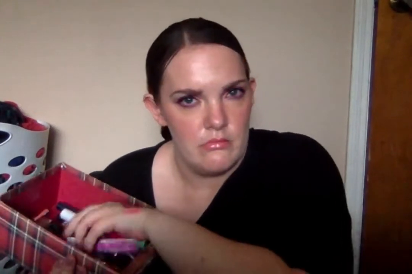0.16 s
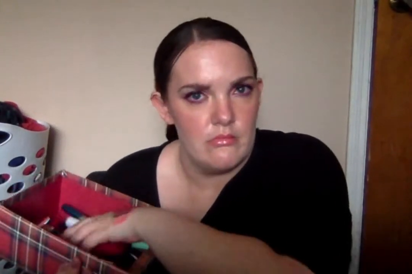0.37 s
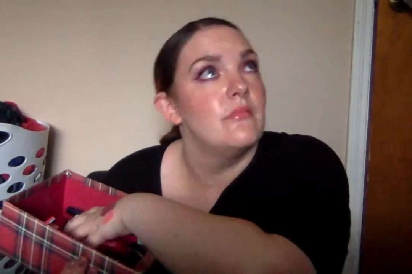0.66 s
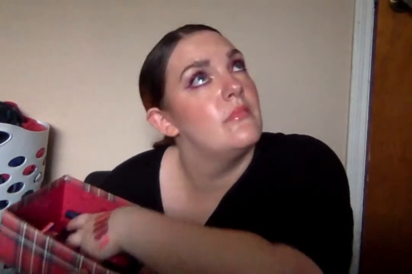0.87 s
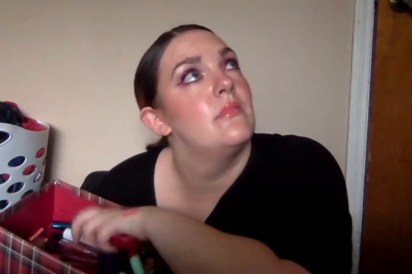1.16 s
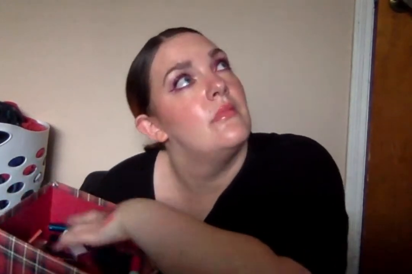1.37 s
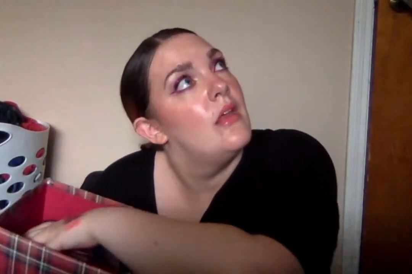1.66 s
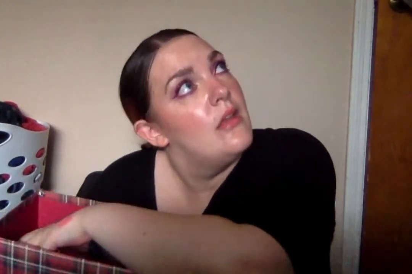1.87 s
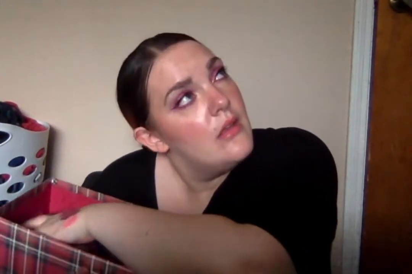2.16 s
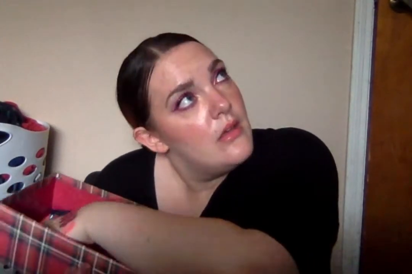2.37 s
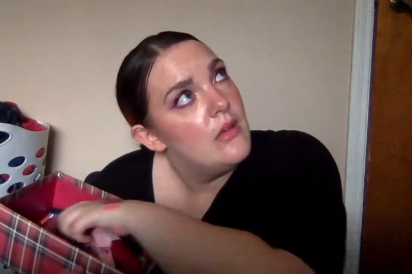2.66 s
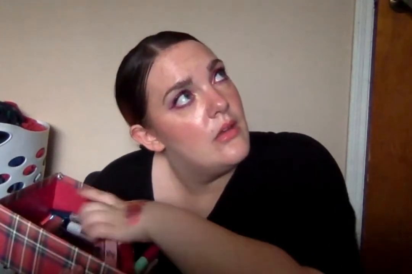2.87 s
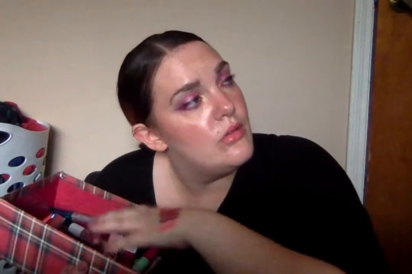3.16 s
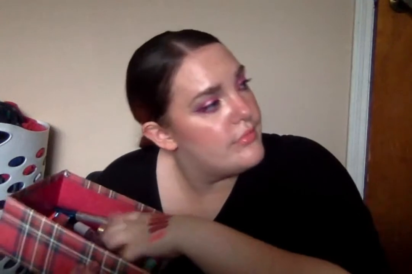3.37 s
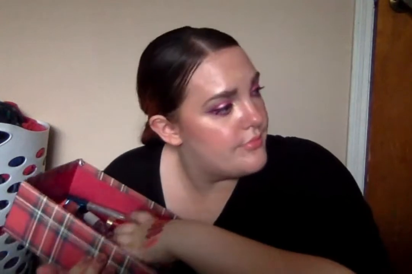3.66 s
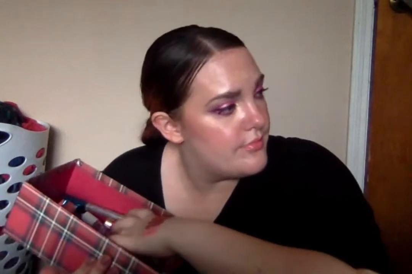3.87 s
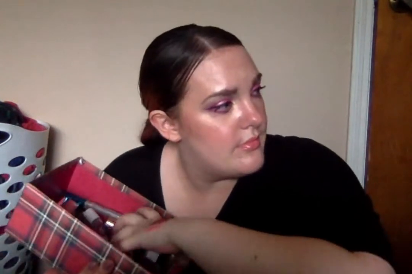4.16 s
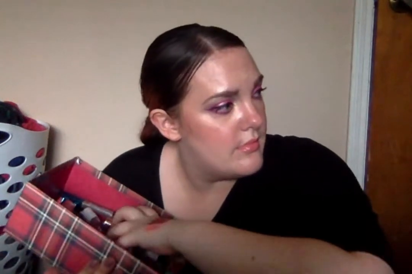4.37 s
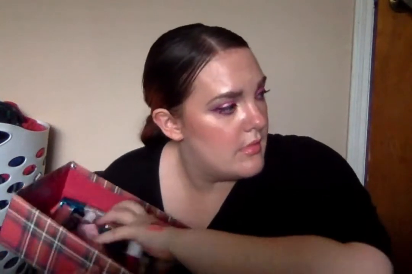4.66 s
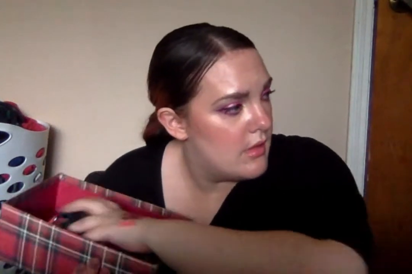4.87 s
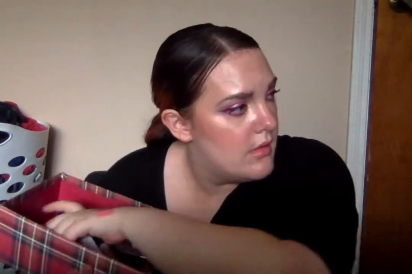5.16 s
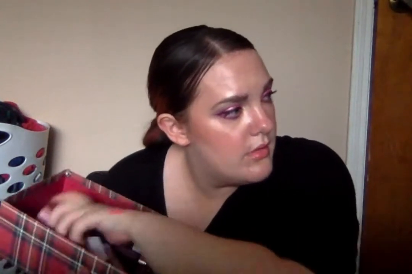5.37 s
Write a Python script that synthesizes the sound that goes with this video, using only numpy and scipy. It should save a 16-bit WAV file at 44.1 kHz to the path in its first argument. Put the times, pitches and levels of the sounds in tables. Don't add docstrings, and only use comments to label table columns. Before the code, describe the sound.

Close rummaging in a cardboard box full of small capped plastic tubes: dry rattle, bright cap clicks and hollow knocks in uneven strokes. Two bursts are separated by a lull, then activity thins to light taps before a strong final flurry ending on heavy knocks. A faint steady laptop hiss and thin whine lie beneath; nearby walls throw back quick, boxy echoes.

```python
import sys
import numpy as np
from scipy import signal
from scipy.fft import rfft, irfft, next_fast_len
from scipy.io import wavfile
from scipy.ndimage import uniform_filter1d

SR = 44100
rng = np.random.default_rng(int(sys.argv[2]) if len(sys.argv) > 2 else 0)


def file_out(sig):
    cols = np.atleast_2d(sig).T
    lim = np.clip(cols, -1, 1)
    pcm = np.round(lim * 32767).astype(np.int16)
    wavfile.write(sys.argv[1], SR, pcm)


def rack_gain(trim_db):
    fader = np.asarray(trim_db, float)
    return 10 ** (fader / 20)


N = 243564
LONG = next_fast_len(N)
ALL_HZ = np.fft.rfftfreq(LONG, 1 / SR)

# (f/Hz, level/dB, t60/s)
BOX_MODES = [(265, 0, .035), (375, -3, .03), (425, 0, .035), (465, 0, .035), (640, -9, .02),
             (730, -4, .025), (850, -7, .02)]
# (f/Hz, level/dB, t60/s)
TUBE_MODES = [(950, -2.5, 0.0087), (1180, 3, 0.012), (1400, -10.5, 0.024), (1531, 7, 0.0085),
              (1849, -3, 0.02), (2185, 6, 0.0078), (2493, 1, 0.007)]
# (f/Hz, level/dB, t60/s)
CAP_MODES = [(3220, 7, 0.0034), (3760, 10.5, 0.0045), (4590, 2.5, 0.0063), (5610, -17, 0.018),
             (6860, -11, 0.0082), (7730, 5, 0.0022), (10640, -19, 0.0069), (10650, -10.5, 0.006),
             (14200, -9, 0.0067), (14330, -6, 0.0044)]


def evened(x):
    return x / np.sqrt(np.mean(x ** 2) + 1e-20)


def read(points, hz):
    f, value = np.transpose(points)
    return np.interp(np.log(hz + 1), np.log(f + 1), value)


def coloured(x, db):
    return irfft(rfft(x, LONG) * rack_gain(db), LONG)[..., :N]


def add(mix, s, sound):
    part = mix[round(s * SR):][:len(sound)]
    part += sound[:len(part)]


def ring(hz, db, t60, rise=0.00036, size=1500):
    t = np.arange(size) / SR
    hz, db, t60 = (np.reshape(v, (-1, 1)) for v in (hz, db, t60))
    sines = rack_gain(db - 60 * t / np.abs(t60)) * np.sin(2 * np.pi * hz * t)
    return sines.sum(0) * (1 - np.exp(-t / rise)) ** 2


def struck(modes, luck, detune, uneven_db, size=1500):
    hz, db, t60 = np.transpose(modes)
    shifted_hz = hz * (1 + detune * luck[:len(hz)])
    weighted_db = db + uneven_db * luck[-len(hz):]
    sound = ring(shifted_hz, weighted_db, t60, rise=0.00057, size=size)
    return sound / abs(sound).max()


def near_note(modes, hz, fall_db=13):
    return [(f, db - fall_db * abs(np.log(f / hz)), t60) for f, db, t60 in modes]


def floor():
    # (f/Hz, level/dB)
    hiss_colour = [(15, -52), (25, -39), (236, -16), (607, -44), (840, -17), (5880, -15), (7510, -13),
                   (8830, -21.5), (11300, -18), (16000, -41)]
    # (f/Hz, peak level/dB)
    whines = [
        (258, -79),
        (7660, -102),
        (11509, -89),
    ]
    hiss = rack_gain(-83) * evened(coloured(rng.standard_normal(N), read(hiss_colour, ALL_HZ)))
    t = np.arange(N) / SR
    waver = evened(uniform_filter1d(rng.standard_normal(N), 600))
    return hiss + sum(rack_gain(db + 2.7 * waver) * np.sin(2 * np.pi * hz * t) for hz, db in whines)


def stirring(height_share, rest_db=0):
    # (deepest t/s, effort level/dB, length/s, height in the heap/dB, higher is brighter)
    strokes = [(.01, -41, 0.12, -16), (0.147, -35, 0.041, -21.5), (0.342, -41.5, 0.21, -8.5),
               (0.504, -75, 0.24, -16), (0.822, -46, 0.1, 19.5), (0.916, -53, 0.064, 14.5),
               (1.036, -46.5, 0.12, 14.5), (1.21, -39, 0.2, -9.5), (1.353, -43.5, 0.11, -16),
               (1.445, -53.5, 0.1, 11.5), (1.644, -63.5, 0.26, -9.5), (2.182, -38.5, 0.13, -3.5),
               (2.327, -34.5, 0.099, -19), (2.433, -43, 0.16, -19.5), (2.553, -39, 0.11, -22.5),
               (2.774, -38, 0.17, -7.5), (3.037, -37.5, 0.12, -8), (2.89, -42, 0.095, -12),
               (2.977, -44.5, 0.071, 4), (3.129, -39, 0.013, -11), (3.462, -48, 0.16, -4),
               (3.752, -57.5, 0.096, 23.5), (3.882, -45.5, 0.14, -29), (4.037, -50, 0.12, -21),
               (4.346, -69, 0.1, -12), (4.246, -67, 0.1, -14), (4.518, -57, 0.07, -39),
               (4.654, -36.5, 0.1, -11.5), (4.716, -43.5, 0.096, 12), (4.778, -42, 0.17, 5),
               (4.847, -32.5, 0.084, -3.5), (4.945, -45, 0.18, 6.5), (5.026, -37.5, 0.073, 1),
               (5.156, -46.5, 0.34, -41), (5.29, -45.5, 0.056, -15), (5.514, -29, 0.15, -30),
               (0.693, -63, 0.14, -23), (3.251, -68, 0.14, 6), (1.531, -60.5, 0.066, 15.5),
               (1.937, -78.5, 0.14, 2)]
    dig_db, settle_db = 49.5, 22.5
    t = np.arange(0, N / SR + .01, .005)
    s, db, length, height_db = np.transpose(strokes)[..., None]
    part = (t - s) / abs(length)
    level_db = db + height_share * height_db + np.where(part < 0, dig_db, -settle_db) * part
    power = (rack_gain(level_db) ** 2).sum(0) + rack_gain(-89 + rest_db) ** 2
    return np.interp(np.arange(N) / SR, t, 10 * np.log10(power))


def rumble():
    band = signal.butter(2, [40, 160], "band", fs=SR, output="sos")
    low = signal.sosfilt(band, rng.standard_normal(N))
    lumps = rack_gain(6 * evened(uniform_filter1d(rng.standard_normal(N), 900)))
    return evened(low * lumps) * rack_gain(0.18 * (stirring(0) + 58.5) - 69)


def bumps():
    # (t/s, peak level/dB, f/Hz)
    knocks = [(0.305, -38.5, 132), (0.797, -41, 132), (1.054, -38, 192), (1.12, -23, 193),
              (2.172, -43, 136), (2.399, -36, 130.9), (2.439, -46.5, 70.0), (2.76, -23, 194.5),
              (2.862, -42, 92), (2.9, -33, 138), (2.916, -41, 115), (3.016, -36.5, 111.4), (3.675, -48, 97),
              (4.246, -60, 65), (1.42, -43, 110), (3.27, -59, 130), (.17, -50, 141), (5.401, -42, 252),
              (5.445, -38, 185)]
    out = np.zeros(N)
    for s, db, hz in knocks:
        add(out, s, ring(hz, db + 12.5, 6.85 / hz, rise=0.0074, size=4000))
    return out


def rattle(modes, level_db, per_s, spread_db, trim_db, count=40, size=1500):
    at = np.flatnonzero(rng.random(N) < per_s / SR)
    strength, side, which = rng.random((N, 3))[at].T
    blows = [struck(modes, luck, 0.1, 5.0, size=size) for luck in rng.standard_normal((count, 20))]
    contact_db = spread_db * np.minimum(-np.log(strength), 4) + trim_db + level_db[at]
    gains = rack_gain(contact_db) * np.sign(side - .5)
    out = np.zeros(N)
    for i, gain, k in zip(at, gains, (which * count).astype(int)):
        add(out, i / SR, gain * blows[k])
    return out / np.sqrt(np.mean(np.square(blows)) * size * per_s / SR)


def heap():
    # (f/Hz, level/dB, t60/s)
    shell_modes = [(2410, -1, 0.0057), (2800, -7.5, 0.02), (3300, -1.5, 0.0033), (3970, -6, 0.01),
                   (4500, -11.5, 0.0056), (5250, -10, 0.0035)]
    box = rattle(BOX_MODES, stirring(0), per_s=210, spread_db=6.5, trim_db=-9.5)
    tubes = rattle(TUBE_MODES, stirring(0.32, rest_db=-4.0), per_s=260, spread_db=5.0, trim_db=-13.5)
    caps = rattle(CAP_MODES, stirring(0.75, rest_db=4), per_s=1000, spread_db=5.5, trim_db=-24.0, size=500)
    shells = rattle(shell_modes, stirring(0.23, rest_db=-6), per_s=500, spread_db=5.5, trim_db=-25.5, size=500)
    return box + tubes + caps + shells


def touches():
    # (t/s, peak level/dB,
    # lower f/Hz, upper level re click/dB, top octave re click/dB)
    clashes = [(0.0600, -25, 3470, -19, -28), (0.3167, -21, 2720, -18.5, -31),
               (0.8202, -30.5, 4450, -14.5, -16.5), (0.922, -28, 4460, -13.5, -26),
               (0.98, -23.5, 3477, -13.5, -24), (1.053, -28.5, 2800, -15.5, -30),
               (1.1686, -25, 2857, -14, -17.5), (1.4117, -29, 2750, -21, -30),
               (2.1839, -27.5, 4900, -17, -25), (2.4878, -30.5, 2920, -14.5, -16.5),
               (2.792, -29, 4020, -16.5, -23), (2.971, -27.5, 4170, -16.5, -38),
               (3.058, -28.5, 2920, -13.5, -23), (3.4003, -29.5, 3880, -24, -27),
               (3.4354, -29, 3740, -20, -15.5), (3.73, -22, 3100, -20, -19.5),
               (3.7394, -42, 4100, -14, -19), (4.659, -28, 2720, -15, -20), (4.699, -21.5, 3440, -9.5, -19),
               (4.8, -22, 3353, -16.5, -19), (4.856, -37.5, 2980, 0, -1), (4.9894, -27.5, 2850, -24, -8),
               (4.998, -24, 3400, -12, -15), (5.262, -24, 2462, -25, -30)]
    # (t/s, peak level/dB, lower f/Hz,
    # upper f/Hz, upper level re click/dB)
    ticks = [(0.3853, -30, 3170, 6120, -11), (0.523, -53, 3040, 8400, -5), (0.565, -31, 4210, 7800, -22),
             (0.658, -38, 3100, 10500, -19), (0.6664, -51, 3100, 5630, 3.5), (1.2763, -29, 4330, 5790, -23),
             (1.37, -26, 3500, 7200, -26.5), (1.6901, -43, 3560, 6330, -18.5),
             (2.0055, -42, 2600, 5430, -30), (2.1047, -40, 3300, 6520, -46), (2.132, -32, 3300, 6380, -33),
             (2.3014, -29, 2920, 5400, -31), (2.443, -27.5, 4080, 5700, -24),
             (2.6614, -26.5, 4340, 6440, -25.5), (2.924, -32, 3220, 6920, -15),
             (3.584, -37, 3130, 7100, -10), (3.983, -49, 2650, 6650, -2.5), (4.019, -40.5, 4260, 6650, -17),
             (4.311, -41, 3694, 5340, -16), (4.408, -43.5, 3890, 6300, -27),
             (4.5995, -31.5, 2540, 5400, -17.5), (5.1404, -36.5, 3740, 5220, -32),
             (5.2614, -30, 3000, 6740, -15), (5.482, -35.5, 3300, 8200, -8)]
    # (t/s, peak level/dB, lower f/Hz, upper f/Hz)
    further_ticks = [(.0513, -44, 3440, 5420), (.2708, -44, 3780, 5070), (0.2941, -32.5, 2930, 5100),
                     (.7846, -52, 4560, 5590), (.7911, -51, 4310, 6930), (0.8123, -22, 4300, 6650),
                     (1.1182, -31, 4500, 8700), (1.263, -31, 2930, 7200), (1.3567, -39.5, 2980, 7400),
                     (1.465, -30, 2510, 6160), (1.516, -45, 3190, 5440), (1.5394, -44, 2920, 5010),
                     (1.5896, -43, 4730, 5200), (2.349, -38.5, 3300, 9450), (2.4373, -46, 4500, 8000),
                     (2.5616, -56, 3030, 5160), (2.583, -64, 2980, 4930), (2.743, -41, 2620, 6130),
                     (2.7665, -49, 2860, 9000), (2.784, -32, 4050, 6600), (2.832, -33, 3720, 6950),
                     (3.02, -32.5, 2830, 4900), (3.079, -32, 3420, 7660), (3.3735, -43.5, 3130, 6130),
                     (3.423, -28.5, 4500, 10900), (3.5674, -56, 2820, 10400), (3.7184, -43, 3400, 10600),
                     (3.9065, -52, 3600, 4970), (4.196, -63, 2900, 5460), (4.261, -52, 2730, 3440),
                     (4.409, -48.5, 2800, 4070), (4.5766, -60, 4400, 5160), (4.9342, -51, 3890, 5285),
                     (4.952, -33, 2820, 5320), (5.4016, -43, 2600, 5100), (5.456, -42, 2800, 5000)]
    upper_hz = 7010 * np.exp(0.13 * rng.standard_normal(len(clashes)))
    return ([(s, db, low, high, up, top) for (s, db, low, up, top), high in zip(clashes, upper_hz)]
            + [(*row, -12 + row[-1]) for row in ticks]
            + [(*row, -15.5, -32.5) for row in further_ticks])


def clicks():
    rows = touches()
    out = np.zeros(N)
    luck, chatter = rng.standard_normal((len(rows), 3, 3, 10)), rng.random((len(rows), 3))
    for (s, db, low_hz, high_hz, upper_db, top_db), blows, later in zip(rows, luck, chatter):
        add(out, s, ring(low_hz, db - 5.5, 28.0 / low_hz, rise=.0004, size=700))
        high_db = db + upper_db + 5.5 - max(db + 26, 0)
        add(out, s, ring(high_hz, high_db, 49.5 / high_hz, rise=0.00032, size=700))
        spread_db = 0.67 * min(db + 29.5, 3)
        for delay, (a, b, c) in zip(.010 * later ** 2, blows):
            lower = struck(CAP_MODES[:3], a, 0.13, 1.0, size=500)
            upper = struck(CAP_MODES[3:6], b, 0.0876, 2.4, size=500)
            top = struck(CAP_MODES[6:], c, 0.097, 3.7, size=500)
            add(out, s + delay, rack_gain(db + spread_db - 15) * lower)
            add(out, s + delay, rack_gain(db + upper_db + spread_db - 7.0) * upper)
            add(out, s + delay, rack_gain(db + top_db + 0.3 * spread_db + 3.5) * top)
    return out


def landings():
    # (t/s, peak level/dB, box f/Hz, tube f/Hz, tube body level re thump/dB)
    drops = [(.295, -22.5, 377, 986, -7), (.796, -18, 480, 1430, -8), (.833, -21, 470, 1390, -26),
             (1.052, -11, 353, 895, -13), (1.117, -8.5, 390, 1880, -10.5), (1.168, -10.5, 405, 2040, -13),
             (1.233, -17.5, 436, 1750, -18.5), (1.412, -15.5, 436, 1280, -13.5),
             (1.428, -13.5, 381, 1425, -13), (2.183, -20, 406, 1160, -19), (2.48, -12, 420, 955, -12.5),
             (2.587, -10.5, 400.7, 1620, -18.5), (2.773, -13, 435, 850, -33), (3.02, -9, 474, 1370, -17.5),
             (3.078, -21.5, 446, 1440, -10.5), (3.437, -12, 550, 1400, -13.5),
             (3.798, -16.5, 500, 1130, -14), (4.814, -15, 521, 1350, -15.5), (4.856, -13, 700, 1090, -38),
             (4.951, -12.5, 546, 890, -11), (5.003, -20.5, 500, 1590, -26), (5.032, -11, 385, 950, -18),
             (5.398, -12.5, 385, 970, -16), (5.455, -8, 450, 883, -15.5)]
    # (t/s, peak level/dB, box f/Hz)
    more_drops = [(0.138, -37, 480), (0.174, -26.5, 485), (0.385, -22, 500), (.674, -30, 403),
                  (1.128, -17.5, 730), (1.325, -21.5, 413), (1.506, -24.5, 460), (1.539, -21, 474),
                  (1.563, -25.5, 426), (1.624, -60, 400), (2.115, -33.5, 462), (2.143, -23, 720),
                  (2.241, -20, 447), (2.613, -23.5, 656), (2.938, -19, 363), (3.242, -37, 520), (3.358, -26, 466),
                  (3.445, -28, 740), (3.609, -31, 490), (3.686, -27.5, 473), (3.901, -19.5, 477),
                  (4.037, -23.5, 500), (4.518, -37.5, 440), (4.508, -43, 707), (4.822, -17, 720),
                  (5.179, -27.5, 425), (5.205, -24.5, 443), (5.375, -29, 470), (5.43, -21, 416), (.254, -37, 444),
                  (.275, -35, 470), (2.679, -28.5, 420), (2.76, -31, 460), (3.335, -52, 459), (5.353, -43, 732)]
    # (t/s, peak level/dB, tube f/Hz, tube body level re thump/dB)
    knocks = [(0.059, -23, 1235, -1), (0.061, -32, 2290, 12.5), (0.079, -48, 2260, -14),
              (0.318, -19.5, 883, -3.5), (0.326, -26.5, 1980, 5), (0.517, -47.5, 894, 9.5),
              (3.688, -51, 960, 4), (.808, -15.5, 960, -7), (0.85, -38, 2250, 13.5),
              (1.018, -19, 1540, -7.5), (1.007, -26, 1310, -10), (1.18, -25, 1970, -7),
              (1.267, -20, 1660, -11), (1.914, -48.5, 1976, 0.5), (1.933, -71, 1670, 22.5),
              (2.006, -46, 1086, 3.5), (2.303, -17, 950, -11.5), (3.405, -31.5, 990, -2),
              (3.736, -19.5, 1026, -13.5), (3.984, -23, 1250, -11), (4.018, -30, 1110, 1),
              (4.227, -42, 1180, -16), (4.259, -44, 1180, -16), (4.316, -39, 1680, 3),
              (4.3091, -45.5, 1910, 7), (4.332, -37.5, 906, -1.5), (4.575, -32, 1470, -9.5),
              (4.599, -28.5, 920, -5.5), (4.665, -25, 1390, -4), (4.678, -41, 950, 16),
              (4.99, -14, 1035, -3), (5.235, -22.5, 1080, -13.5), (.768, -41.5, 1040, -4),
              (1.358, -33, 1790, 3), (1.743, -46, 1111, -14), (2.738, -41, 1020, -4),
              (3.586, -48, 1770, -6), (4.141, -53.5, 970, 3.5), (4.416, -54, 2280, 2.5)]
    tube_hz = 1148 * np.exp(0.254 * rng.standard_normal(len(more_drops)))
    box_hz = 500 * np.exp(0.42 * np.tanh(rng.standard_normal(len(knocks))))
    return (drops + [(s, db, hz, other, -13.5) for (s, db, hz), other in zip(more_drops, tube_hz)]
            + [(s, db, other, hz, body) for (s, db, hz, body), other in zip(knocks, box_hz)])


def thumps():
    rows = landings()
    out, luck = np.zeros(N), rng.standard_normal((len(rows), 2, 20))
    for (s, db, box_hz, tube_hz, body_db), (a, b) in zip(rows, luck):
        add(out, s, -ring(box_hz, db - 13.0, 16.5 / box_hz, rise=0.0003))
        add(out, s, -rack_gain(db - 8) * struck(near_note(BOX_MODES, box_hz), a, .04, 4.0))
        add(out, s, ring(tube_hz, db + body_db - 1.0, 24 / tube_hz, rise=.0007))
        jolted_cap = struck(CAP_MODES[:4], b, 0.11, 8.8, size=500)
        add(out, s, rack_gain(1.35 * db + body_db / 2 - 18) * jolted_cap)
        spread_db = 0.19 * (db + 16.5)
        body = struck(near_note(TUBE_MODES, tube_hz, fall_db=5), b, 0.069, 2.8)
        add(out, s, rack_gain(db + body_db + spread_db - 4.0) * body)
    return out


def sparse_tail(decay):
    start_s, knee_s, cut_db_per_s = 0.01178, 0.069, 450
    taps = np.zeros(SR // 5)
    slots = np.arange(0, len(taps) - 20, 20)
    at = slots + rng.integers(0, 20, len(slots))
    taps[at] = rng.choice([-1., 1.], len(at))
    hz, t, z = signal.stft(taps, SR, nperseg=256)
    tail = signal.istft(z * rack_gain(-60 * t / read(decay, hz)[:, None]), SR, nperseg=256)[1]
    age = np.arange(len(tail)) / SR
    tail = tail * np.clip((age - start_s) / 0.00069, 0, 1)
    tail = tail * rack_gain(-cut_db_per_s * np.maximum(age - knee_s, 0))
    return tail / np.linalg.norm(tail)


def room(x, turns_per_s=14.0, count=5):
    # (f/Hz, level/dB)
    wall_colour = [(150, -28), (450, -9.5), (1200, 1.5), (4000, 0), (9000, 3.5), (15000, -1.5)]
    # (f/Hz, t60/s)
    decay = [(150, 0.24), (500, 0.32), (1400, 0.44), (3700, 0.25), (9700, 0.24), (15000, 0.058)]
    # (delay t/s, level/dB)
    echoes = [(.0030, -7.5), (.0082, 2), (0.0112, -2), (0.0174, -12), (0.024, -5), (0.03, -8)]
    wet = coloured(x, read(wall_colour, ALL_HZ))
    out = x.copy()
    turn = np.arange(N) / SR * turns_per_s
    for k in range(count):
        response = sparse_tail(decay)
        for (s, db), luck in zip(echoes, rng.standard_normal((len(echoes), 4))):
            add(response, s * (1 + .025 * luck[0]), rack_gain(db) * np.array([1]))
            add(response, s + .0006 + .0003 * abs(luck[1]), rack_gain(db - 5) * np.sign(luck[2:3]))
        share = np.cos(np.pi / 2 * np.minimum(abs((turn - k) % count - 1), 1))
        out += signal.oaconvolve(wet * share, response)[:N]
    return out


def scene():
    near = clicks()
    hits = thumps() + near + heap()
    no_bass = signal.butter(2, 215, "high", fs=SR, output="sos")
    hits = signal.sosfilt(no_bass, hits)
    return (room(hits) + rack_gain(-4.5) * near + bumps() + rumble() + floor())[None]


def band_limit(x):
    return signal.sosfilt(signal.butter(12, 16680, fs=SR, output="sos"), x)


def record(dry):
    # (f/Hz, width/Hz, level/dB)
    port = [(13070, 1920, -7.5)]
    notch_db = sum(db * np.exp(-((ALL_HZ - f) / width) ** 2) for f, width, db in port)
    limit_db = -np.clip((ALL_HZ - 15700) / 12, 0, 60)
    bass_cut = signal.butter(1, 30, "high", fs=SR, output="sos")
    thin = signal.sosfilt(bass_cut, coloured(dry, notch_db + limit_db))
    return band_limit(thin)


dry = scene()
out = record(dry)
file_out(out)
```